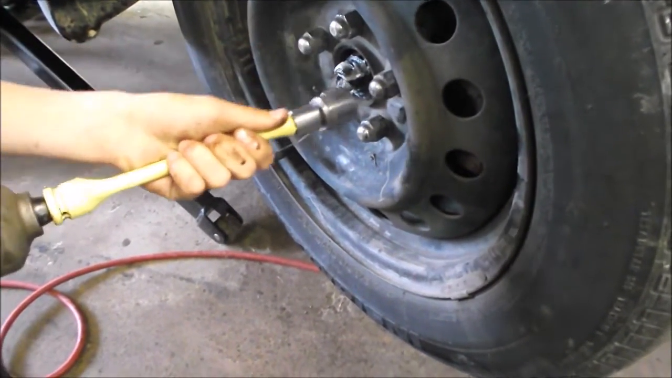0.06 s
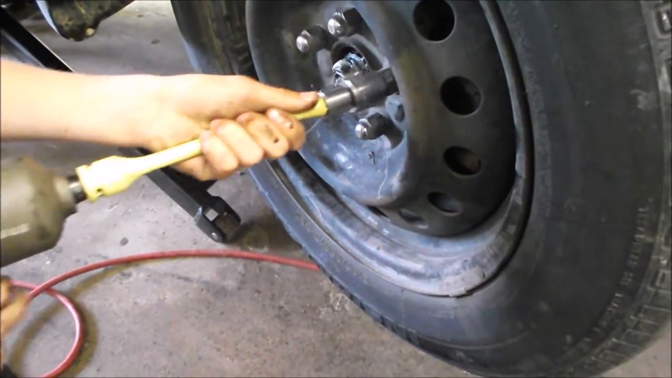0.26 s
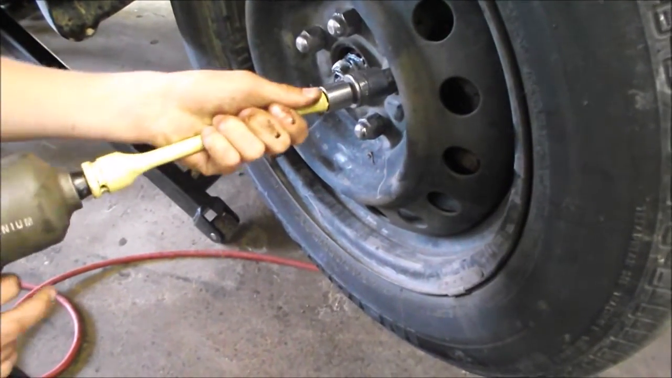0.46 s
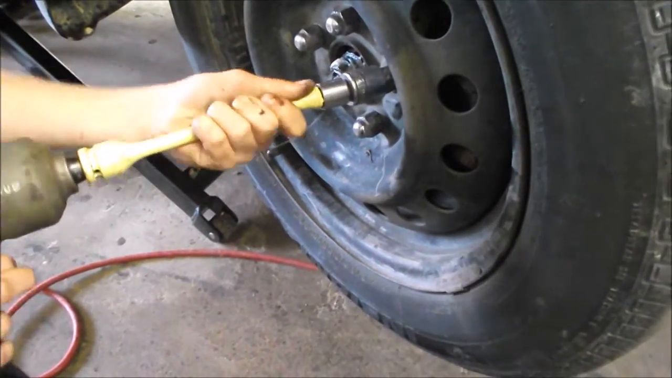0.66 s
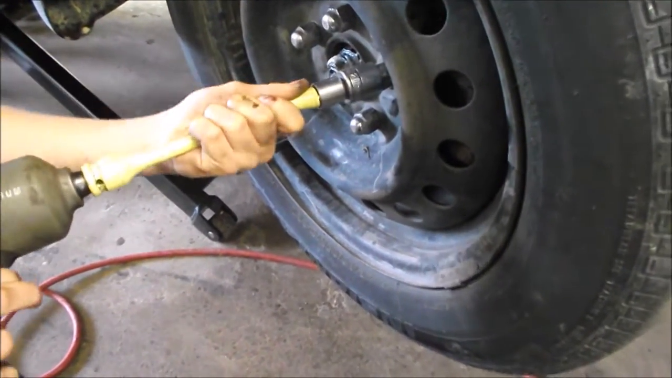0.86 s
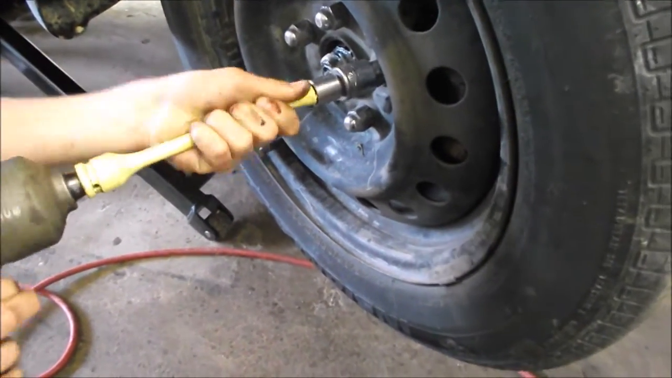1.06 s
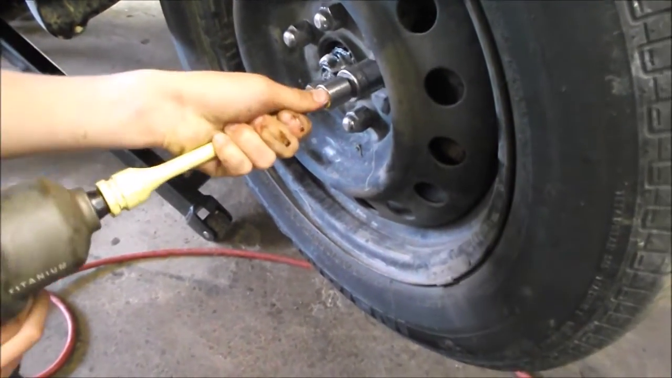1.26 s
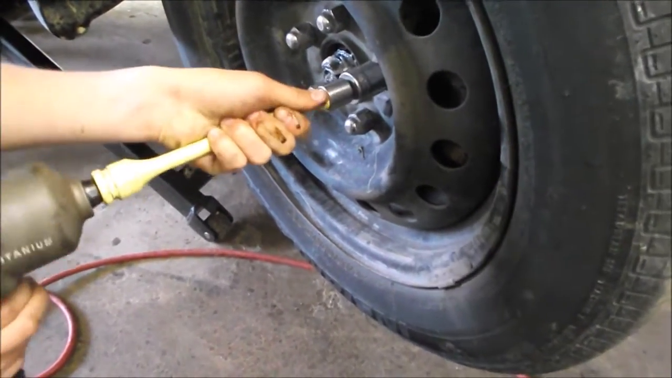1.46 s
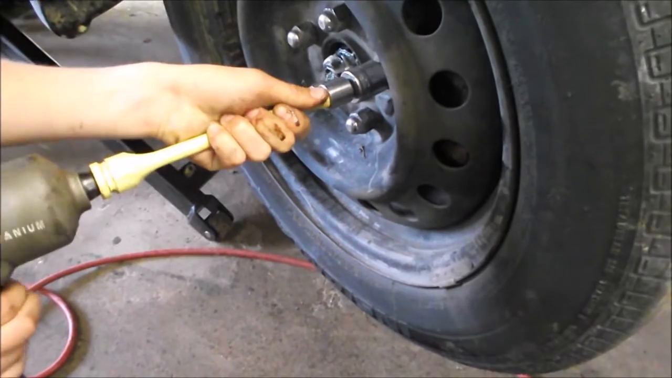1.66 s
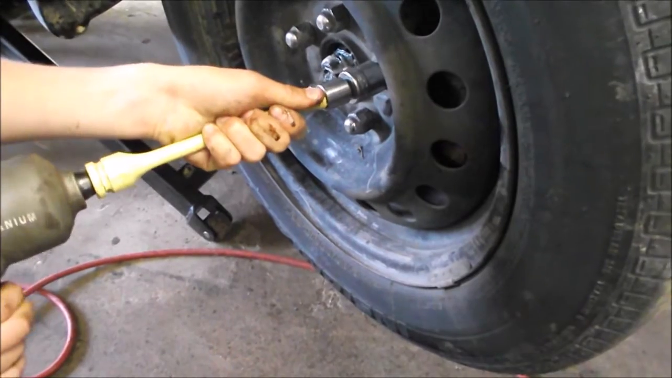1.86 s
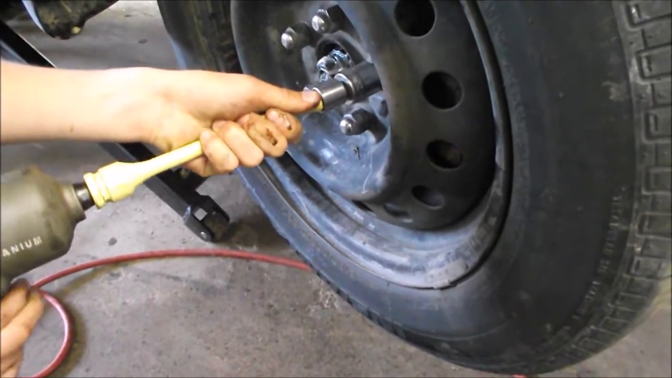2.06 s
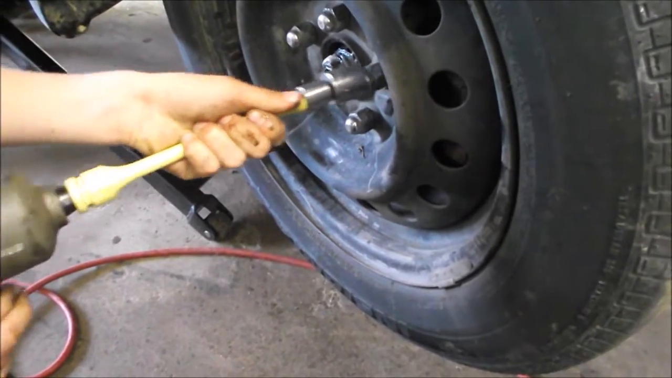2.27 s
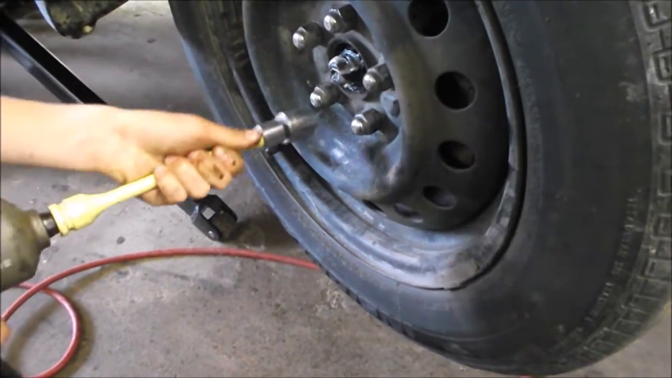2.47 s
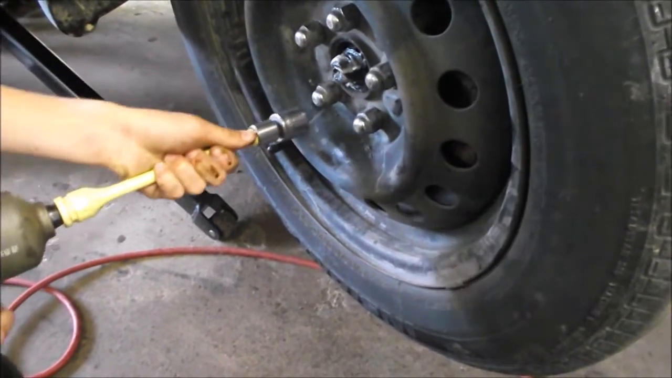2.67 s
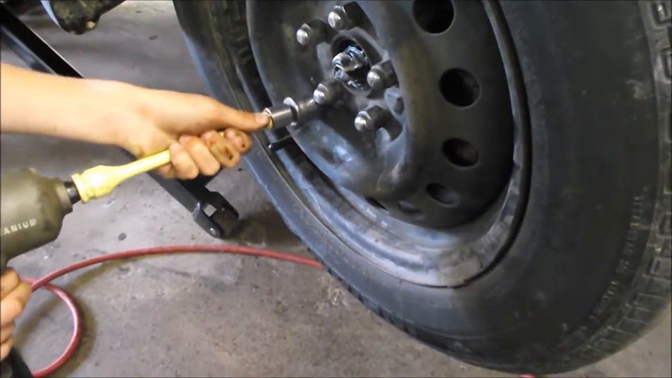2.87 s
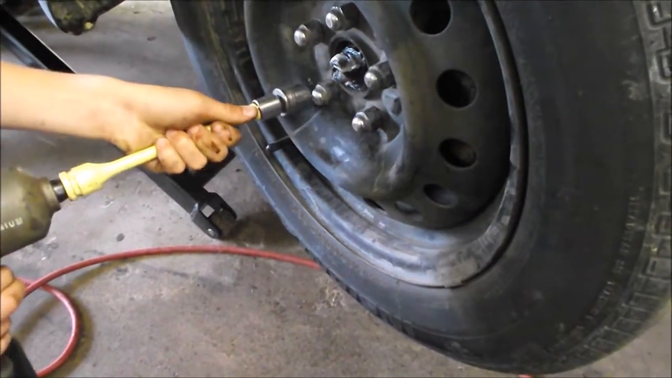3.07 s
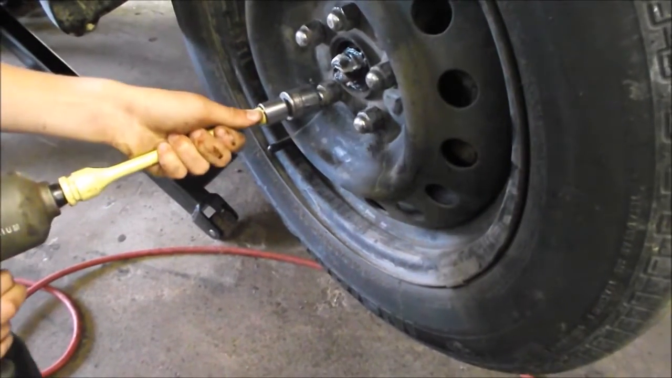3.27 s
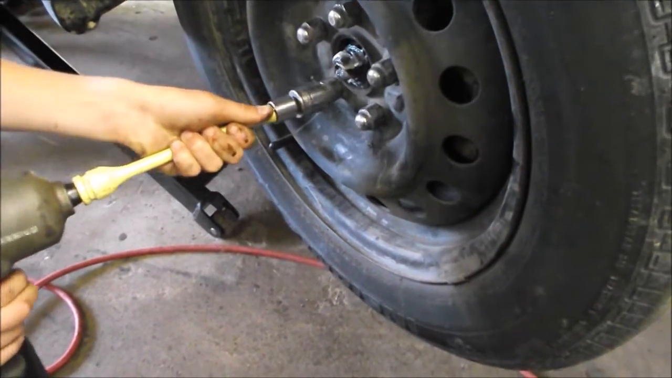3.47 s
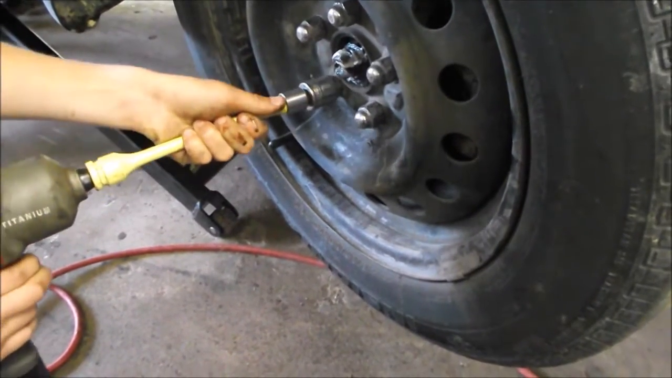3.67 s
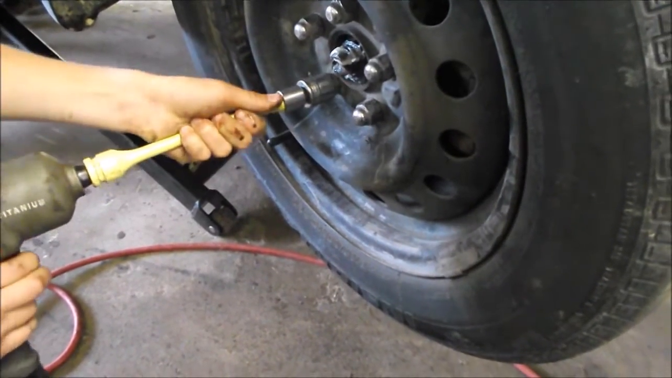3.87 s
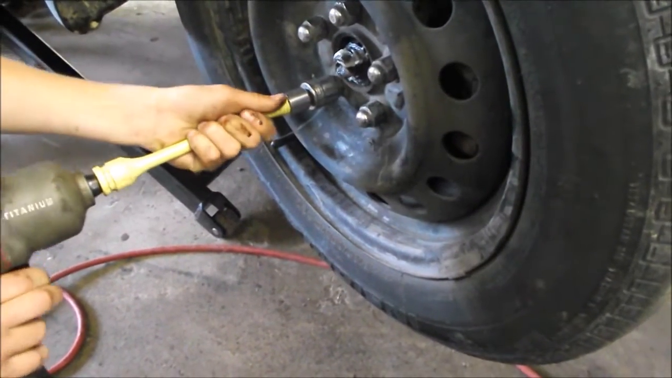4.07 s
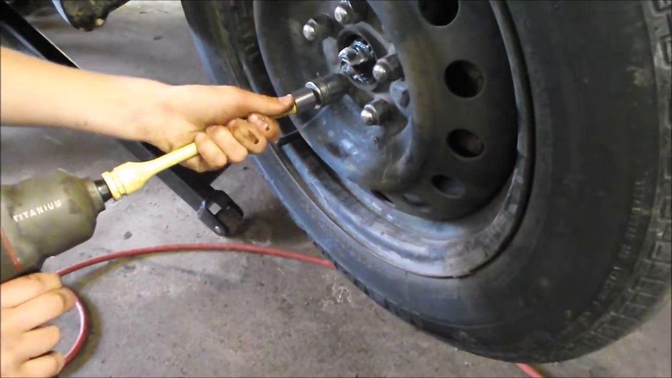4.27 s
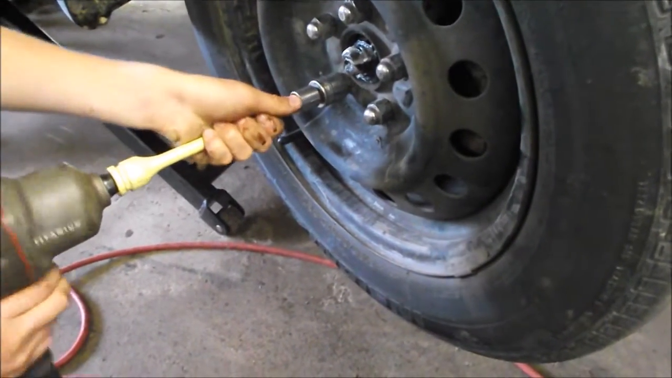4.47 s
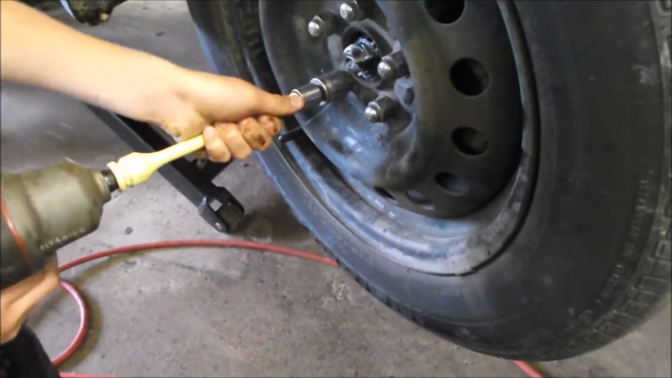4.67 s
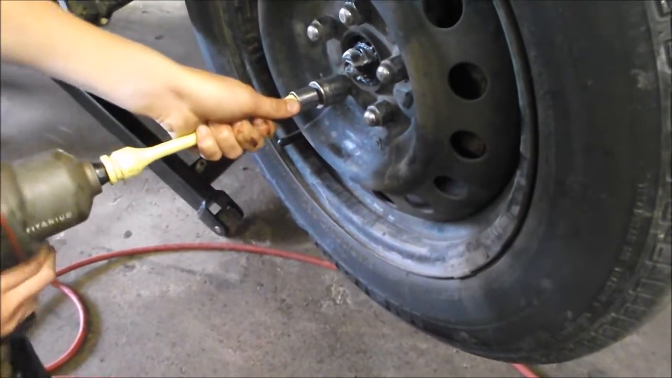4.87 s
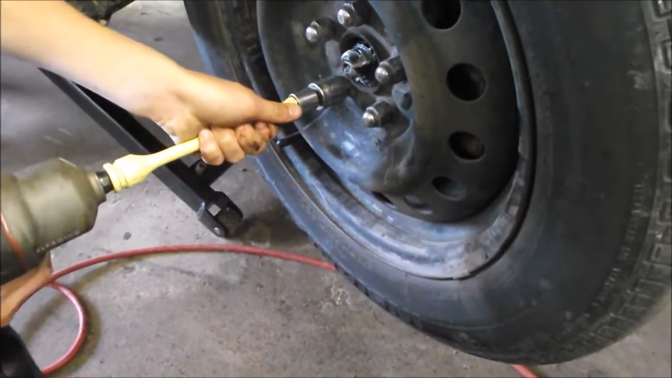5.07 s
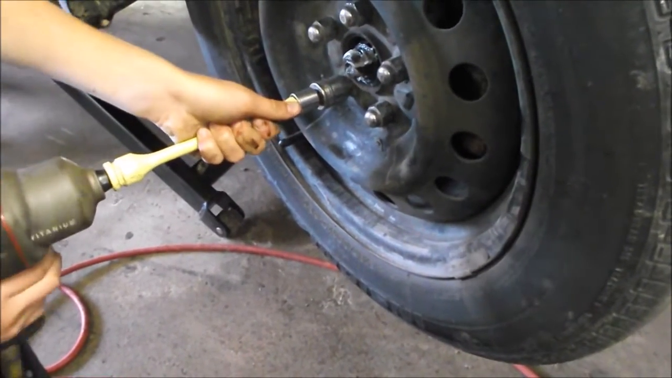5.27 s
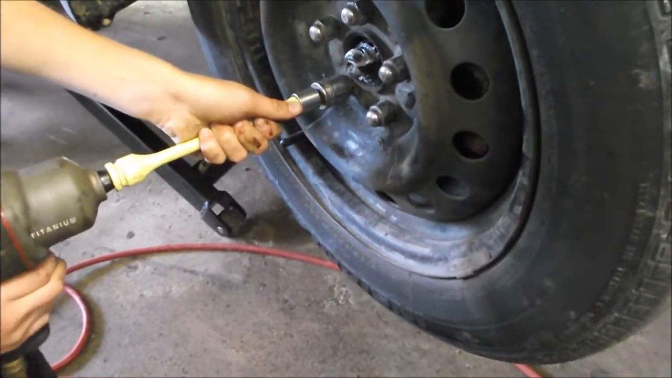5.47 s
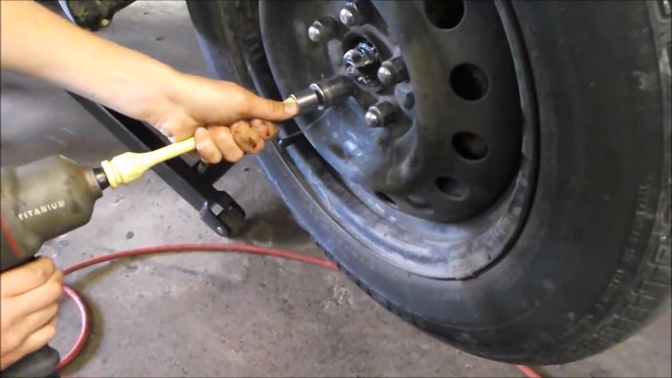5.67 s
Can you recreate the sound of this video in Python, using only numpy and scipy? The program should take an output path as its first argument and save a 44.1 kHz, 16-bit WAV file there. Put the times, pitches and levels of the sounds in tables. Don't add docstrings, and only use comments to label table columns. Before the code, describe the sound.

A low, steady garage hum with faint hiss and a thin high whine runs throughout. At about 0.2 s a loose socket makes a quick cluster of bright clicks and dull taps on nuts and wheel, with a faint ring at 0.44. Light ticks follow near 1 s, then a hard, ringing clang at 1.15. At 1.5 an air wrench opens with whistling hiss, slams at 1.57 and hammers until about 2.03: each cycle hisses, spins up in quickening throaty puffs, then cracks sharply on ringing steel. Air fades by 2.3. Bar taps ring at 2.16 and 2.25, clacks at 2.78, a click at 2.89. A dense, loud clatter of socket and wheel spans 3.4-3.6, ending in a clang. Only hum and very faint ticks around 4.3-4.55 remain. At 5.4 air rushes again, and a harder second burst hammers from 5.47 until cut off around 5.7. Close, slightly overloaded, with short metallic echo.

```python
import sys
import numpy as np
from scipy import signal
from scipy.fft import rfft, irfft
from scipy.io import wavfile
from scipy.ndimage import uniform_filter1d

SR = 44100
rng = np.random.default_rng(int(sys.argv[2]) if len(sys.argv) > 2 else 0)


def attenuation_scalar(level_db):
    decades = np.asarray(level_db, float) / 20
    return 10 ** decades


def put_to_file(sound):
    columns = np.atleast_2d(sound).T
    safe = np.clip(columns, -1, 1)
    whole_steps = np.round(safe * 32767)
    wavfile.write(sys.argv[1], SR, whole_steps.astype(np.int16))


N = 251811

# freq_hz, density_db_per_hz
HUM_SPECTRUM = [(12, -34), (20, -5), (55, 3.5), (90, -0.5), (122, -0.5), (299, -11), (325, -10.5),
                (353, -11.5), (454, -9.5), (493, -12), (910, -8), (2930, -23.5), (9730, -28),
                (10900, -31.5), (15600, -32.5)]
# freq_hz, level_db
WHINE_TONES = [(360, -63), (10530, -93), (10610, -58.5), (10691, -69), (10772, -104)]

# freq_hz, level_db, t60_s
NUT_MODES = [(850, -4, .04), (1150, 0, .04), (1390, 2, .07), (1825, -8, .08), (2013, -6, .1),
             (2304, -3, .11), (2560, -2, .06), (2929, -1, .07), (3230, -2, .07), (3420, -2, .06),
             (3569, -1, .1), (3870, -1, .07), (4312, -5, .08), (4970, -5, .07), (5609, -3, .07),
             (6137, -5, .07), (6503, -3, .09), (8070, -4, .07), (9335, -3, .05)]
# freq_hz, level_db, t60_s
SOCKET_MODES = [(1227, -1, .38), (1360, -4, .12), (6503, -9, .12), (8030, -15, .15), (7461, -22, .2)]
# freq_hz, level_db, t60_s
WHEEL_MODES = [(2686, -4, .18), (3089, -4, .2), (3134, -3, .6), (3165, -1, .35), (3222, -3, .15),
               (5039, -13, .28), (5593, -7, .22), (5625, -9, .2)]
# freq_hz, level_db, t60_s
BAR_MODES = [(3671, -8, .52), (3967, -17, .3), (6492, -18, .3)]

# start_s, crack_peak_db, crack_hz, ring_re_crack_db
SOCKET_CLICKS = [(.2115, -12, 8767, -26), (.2228, -8, 3300, -17), (.2520, -11, 4100, -37),
                 (1.1040, -12, 3340, -21), (1.1165, -10.5, 3190, -38), (2.8889, -4.5, 3250, -22.5),
                 (3.4074, -4.5, 3630, -26.5), (3.4766, 3.5, 3720, -25.5), (3.4830, -11.5, 8100, -34),
                 (3.4860, 2, 5570, -41), (3.5255, -7.5, 3950, -23), (3.5499, -10.5, 5630, -12.5),
                 (3.5699, -8.5, 3500, -29)]
# start_s, crack_peak_db, crack_hz, ring_re_crack_db
WHEEL_CLICKS = [
    (.2095, -6.5, 5570, -25.5),
    (.2634, -5, 2770, -41),
    (.4375, -39, 3260, -11),
    (1.1469, 2.5, 3001, -23),
    (1.1490, -5, 5210, -46),
    (2.3871, -28.5, 2570, -18),
    (3.4915, -3, 6260, -39),
    (3.4968, -3, 4800, -19),
    (3.5928, 2, 3075, -28.5),
]
# start_s, crack_peak_db, crack_hz, ring_re_crack_db
BAR_CLICKS = [
    (2.1561, -4.5, 5670, -17),
    (2.2509, -11.5, 3580, -10),
    (2.7747, -1.5, 2840, -44),
    (2.7840, -3.5, 2105, -37),
]
# start_s, crack_peak_db, crack_hz
NUT_TAPS = [
    (.2240, -23, 1340),
    (.2655, -6.5, 1386),
    (1.1300, -22, 1100),
    (1.1567, -8, 3350),
    (1.161, -15.5, 790),
    (2.7765, -9, 8060),
    (2.7790, -7.5, 1133),
    (3.478, -15, 7700),
]
# start_s, crack_peak_db, crack_hz
LOOSE_TICKS = [(0.9587, -14.5, 3050), (0.964, -23, 1490), (1.0342, -25, 3730), (1.0461, -20.5, 3370),
               (1.4704, -18.5, 2570), (1.4705, -34, 6300), (1.5470, -24, 2500), (2.8645, -18.5, 4900),
               (4.3033, -28, 2920), (4.329, -33, 3880), (4.3905, -37, 4000), (4.5284, -35, 4450),
               (4.5550, -36.5, 2410)]
# socket_db, wheel_db, bar_db
SOCKET_SPREAD_DB = (0, -20, -18)
# socket_db, wheel_db, bar_db
WHEEL_SPREAD_DB = (-9, 0, -16)
# socket_db, wheel_db, bar_db
BAR_SPREAD_DB = (-13, -15, 0)
# start_s, crack_peak_db, crack_hz, bar_ring_re_crack_db
HAMMER_KNOCKS = [(1.584, -20, 4570, -35), (1.6103, -5.5, 6160, -26), (1.6376, -4, 3530, -39),
                 (1.6764, -20, 6160, -27), (1.704, 4, 5900, -38), (1.723, -14, 5370, -24),
                 (1.7967, 4.5, 5470, -40), (1.8234, -2, 3610, -24), (1.8972, 0, 6480, -38),
                 (1.92, 3, 3900, -20), (1.9399, 5.5, 3830, -21), (2.0304, -0.5, 5640, -11.5),
                 (5.4869, -1, 4400, -75), (5.5167, -1.5, 6670, -32), (5.5467, 2, 5760, -33),
                 (5.6102, -1.5, 3970, -45), (5.6181, 3.5, 3700, -31), (5.638, 5, 4350, -21),
                 (5.7044, 2.5, 5680, -24)]
# freq_hz, t60_s
GARAGE_T60 = [(200, 0.4), (1000, 0.29), (4000, 0.64), (12000, 0.16)]

# time_s, pressure_db
TRIGGER_PULLS = [
    [(1.51, -71), (1.534, -22.5), (1.57, 0), (1.75, -2.5), (2.024, -1.5), (2.24, -32), (2.3, -38)],
    [(5.4, -51), (5.456, -8.5), (5.468, -3.5), (5.56, -0.5), (5.61, -3), (5.71, 0.5)],
]
# start_s, level_db
INLET_SLAMS = [
    (1.5727, -3.5),
    (5.471, 1),
]
# freq_hz, width_hz, level_db
SEAT_WHISTLE = [(2500, 210, 10.5), (4400, 73, 8), (6750, 1000, -2.5), (9140, 6400, -5)]
# freq_hz, density_db_per_hz
JET_SPECTRUM = [(1000, -71), (1700, -9), (1920, -23), (2330, -6), (2630, 0.5), (3380, -0.5), (3780, -2.5),
                (4140, -2.5), (5270, -2.5), (6350, -2.5), (7100, -8.5), (10800, -12.5), (15600, -36)]
# freq_hz, density_db_per_hz
HOUSING_SPECTRUM = [(15, -45), (25, -2), (114, -15), (265, -6), (465, -8), (560, -13), (771, -10),
                    (1160, -3.5), (1350, -7.5), (1890, -21), (2200, -18.5), (2860, -20), (4840, -120)]
# first_puff_s, last_puff_s, puff_gaps, start_rate_puffs_per_s, puff_db
SPIN_UPS = [
    (1.5918, 1.6354, 6, 65, -1),
    (1.6744, 1.7260, 8, 85, -2),
    (1.7699, 1.8214, 8, 85, -2),
    (1.8677, 1.9187, 8, 88, -2),
    (1.9624, 2.0105, 5, 80, -10),
    (5.4984, 5.5442, 6, 62, -1),
    (5.5920, 5.6345, 7, 108, -2.5),
    (5.6853, 5.7085, 4, 95, -2),
]

# centre_s, threshold_db
DROPOUTS = [(.066, -19), (.244, 4), (.540, -17), (.585, -19), (.690, -15), (.820, -18), (1.287, -13),
            (1.394, -11), (2.227, -7), (2.612, -15), (2.670, -17), (2.760, -7), (3.016, -12), (3.4275, 3),
            (3.461, -3), (3.720, -14), (3.955, -19), (3.995, -19), (4.272, -16), (4.445, -17), (4.745, -16),
            (4.975, -19), (5.105, -19)]
DEEP_DROPOUTS = [.635, 3.24, 4.841, 5.245]


def evened(x):
    return x / np.sqrt(np.mean(x ** 2) + 1e-20)


def read(points, hz):
    f, value = np.transpose(points)
    return np.interp(np.log(hz + 1), np.log(f + 1), value)


def add(mix, start_s, sound):
    part = mix[round(start_s * SR):][:len(sound)]
    part += sound[:len(part)]


def band(x, hz, width_hz):
    q = max(hz / width_hz, .3)
    return signal.lfilter(*signal.iirpeak(min(hz, 15000), q, SR), x)


def noise(spectrum):
    gain = attenuation_scalar(read(spectrum, np.fft.rfftfreq(N, 1 / SR)))
    return evened(irfft(rfft(rng.standard_normal(N)) * gain, N))


def flicker(span_s):
    size = max(round(span_s * SR), 1)
    smooth = uniform_filter1d(rng.standard_normal(N), size)
    return evened(uniform_filter1d(smooth, size))


def background():
    t = np.arange(N) / SR
    tones = sum(np.sqrt(2) * attenuation_scalar(db) * np.sin(2 * np.pi * hz * t) for hz, db in WHINE_TONES)
    tones += attenuation_scalar(-54) * band(rng.standard_normal(N), 13000, 120)
    hum_db = -42 + 0.09 * flicker(0.019)
    return attenuation_scalar(hum_db) * noise(HUM_SPECTRUM) + tones


def contacts():
    held_db = (-42, -42, -42)
    blows = [(s, db, hz, -28, -30, bar_db) for s, db, hz, bar_db in HAMMER_KNOCKS]
    clicks = [(*row, *held_db) for row in NUT_TAPS]
    for rows, spread_db in ((SOCKET_CLICKS, SOCKET_SPREAD_DB), (WHEEL_CLICKS, WHEEL_SPREAD_DB),
                            (BAR_CLICKS, BAR_SPREAD_DB)):
        clicks += [(s, db, hz, *(ring_db + np.array(spread_db))) for s, db, hz, ring_db in rows]
    ticks = [(*row, *held_db) for row in LOOSE_TICKS]
    return blows, sorted(clicks), ticks


def ring(modes, t):
    hz, db, t60_s = np.transpose(modes)[:, :, None]
    return attenuation_scalar(db - 60 * t / t60_s) * np.exp(2j * np.pi * hz * t)


def knocks(rows, rattle_t60_s, nut_db, thud_db, splash, focus_db_per_octave, after_db):
    out, t = np.zeros(N), np.arange(24000) / SR
    u = t[:7000]
    nut = ring(NUT_MODES, u)
    nut_hz = np.array(NUT_MODES)[:, 0]
    parts = [ring(modes, t) for modes in (SOCKET_MODES, WHEEL_MODES, BAR_MODES)]
    rise = 1 - np.exp(-t / 0.000067)
    thud = attenuation_scalar(thud_db - 60 * u / 0.14) * np.sin(2 * np.pi * 280 * u)
    for (s, db, hz, *rings_db), turns in zip(rows, rng.random((len(rows), len(NUT_MODES)))):
        phases = np.exp(2j * np.pi * turns)
        decay = attenuation_scalar(-60 * u / 0.003) + 0.41 * attenuation_scalar(-60 * u / rattle_t60_s)
        rattle = rng.standard_normal(len(u)) * decay
        ping_decay = 0.68 * attenuation_scalar(-60 * u / 0.011) + attenuation_scalar(after_db - 60 * u / .11)
        ping = ping_decay * np.sin(2 * np.pi * hz * u)
        crack = band(band(rattle, hz, 0.48 * hz), hz, 2.5 * hz)
        crack += splash * band(rattle, 8500, 4000) * attenuation_scalar(-60 * u / 0.01)
        near = attenuation_scalar(nut_db - focus_db_per_octave * abs(np.log2(nut_hz / hz)))
        uneven = attenuation_scalar(5 * np.cos(7 * np.pi * turns))
        nut_ring = ((near * phases * uneven) @ nut).imag
        add(out, s, attenuation_scalar(db) * (ping + crack + thud + rise[:len(u)] * nut_ring))
        for part, ring_db in zip(parts, rings_db):
            add(out, s, attenuation_scalar(db + ring_db) * rise * (phases[:len(part)] @ part).imag)
    return out


def garage(x):
    taps = np.zeros(SR)
    at = np.arange(200, SR - 20, 20) + rng.integers(0, 20, (SR - 201) // 20)
    taps[at] = rng.choice([-1., 1.], len(at))
    hz, t, z = signal.stft(taps, SR, nperseg=256)
    decay = attenuation_scalar(-60 * t / read(GARAGE_T60, hz)[:, None])
    tail = signal.istft(z * decay, SR, nperseg=256)[1]
    return signal.fftconvolve(x, tail / np.linalg.norm(tail))[:N]


def air(puffs, speed):
    t = np.arange(N) / SR
    pulls_db = [np.interp(t, *np.transpose(pull), left=-99, right=-99) for pull in TRIGGER_PULLS]
    pressure_db = np.max(pulls_db, axis=0)

    strikes_s = [row[1] for row in SPIN_UPS]
    resets_s = sorted([s for s, db in INLET_SLAMS] + [s + 0.0034 for s in strikes_s])
    wound_points = sorted([(s, 0) for s in resets_s] + [(s, 1) for s in strikes_s])
    wound = np.interp(t, *np.transpose(wound_points))

    shut = sum((t > s - .2) & (t < s) for s, db in INLET_SLAMS) * np.clip(-pressure_db / 10, 0, 1)
    hiss_db = -11.5 + pressure_db - 2 * wound
    roar_db = -9 + 0.77 * pressure_db + 3 * wound - 8.5 * shut

    opening = sum(np.clip((t - s + 0.11) / .01, 0, 1) * np.clip((s + 0.013 - t) / 0.018, 0, 1)
                  for s, db in INLET_SLAMS)
    white = rng.standard_normal(N)
    whistle = evened(sum(attenuation_scalar(db) * band(band(white, hz, width_hz), hz, width_hz)
                         for hz, width_hz, db in SEAT_WHISTLE))
    jet = (1 - 0.9 * opening) * noise(JET_SPECTRUM) + 0.6 * opening * whistle
    choke_db = 14 * np.clip(puffs, 0, 1)
    hiss = attenuation_scalar(hiss_db - 14.0 * speed - choke_db + 2.68 * flicker(0.0021) + 2.0) * jet
    roar = attenuation_scalar(roar_db - 2.9 * speed + 2.1 * flicker(0.0021) - 3.5) * noise(HOUSING_SPECTRUM)
    return hiss + roar


def puff(width_s, rebound):
    u = (np.arange(600) - 100) / SR / width_s
    return np.exp(-u ** 2) - rebound * np.exp(-((u - 1.9) / 0.82) ** 2)


def motor():
    out, speed = np.zeros(N), np.zeros(N)
    lead_s = 100 / SR
    for first, last, gaps, rate, db in SPIN_UPS:
        span = last - first
        k = np.arange(round(gaps) + 1)
        push = 2 * (k[-1] - rate * span) / span ** 2
        times = (np.sqrt(rate ** 2 + 2 * push * k) - rate) / push
        for s, chance in zip(times, rng.standard_normal((len(k), 2))):
            width_s = 0.058 / (rate + push * s) + 0.00014
            rebound = (0.22 + 0.72 * min(4 * s / span, 1)) * attenuation_scalar(2.5 * chance[1])
            add(out, first + s - lead_s, attenuation_scalar(db + 0.13 * chance[0]) * puff(width_s, rebound))
        top = attenuation_scalar(2 * db)
        add(speed, first, top * np.linspace(0, 1, round((span + 0.0027) * SR)))
        add(speed, last + 0.0038, top * np.linspace(.8, 0, round(0.0046 * SR)))
    for s, db in INLET_SLAMS:
        add(out, s - lead_s, -attenuation_scalar(db) * puff(0.00054, 0.55))
    return out + 0.74 * band(out, 1620, 290), speed


def scene():
    blows, clicks, ticks = contacts()
    steel = knocks(clicks, 0.052, -23, -36.5, 0.027, 2.2, -22)
    steel += knocks(ticks, 0.063, -26, -26, 0.53, 1.9, -46)
    steel += knocks(blows, 0.026, -22, -25.5, 1.0, 2.6, -21)
    puffs, speed = motor()
    wrench = puffs + air(puffs, speed)
    echo = attenuation_scalar(-15.5) * garage(steel) + attenuation_scalar(-10.5) * garage(puffs)
    return (background() + steel + wrench + echo)[None]


def limit(x):
    fall_db = np.arange(N) * 290.0 / SR
    level_db = 20 * np.log10(abs(x) + 1e-9)
    over_db = np.maximum(np.maximum.accumulate(level_db + fall_db) - fall_db, 0)
    ducked = x / attenuation_scalar(0.68 * uniform_filter1d(over_db, 20))
    return np.clip(ducked, -.99, .99)


def drop_weak_partials(x):
    size = 1400
    out, window = x.copy(), np.sin(np.pi * np.arange(size) / size)
    hz = np.fft.rfftfreq(size, 1 / SR)
    tilt_db = read([(900, -34), (1800, 4), (5000, -2.5), (15000, 0)], hz)
    deep = [(s + side_s, -3) for s in DEEP_DROPOUTS for side_s in (-.006, .006)]
    for s, db in list(DROPOUTS) + deep:
        start = round(s * SR) - size // 2
        z = rfft(x[start:start + size] * window)
        weak = z / (1 + (abs(z) / attenuation_scalar(db + tilt_db)) ** 6)
        add(out, start / SR, -window * irfft(weak))
    return out


def band_limit(x):
    return signal.sosfilt(signal.butter(12, 15770, fs=SR, output="sos"), x)


def record(dry):
    mix = drop_weak_partials(limit(dry[0]))[None]
    return band_limit(mix)


dry = scene()
out = record(dry)
put_to_file(out)
```